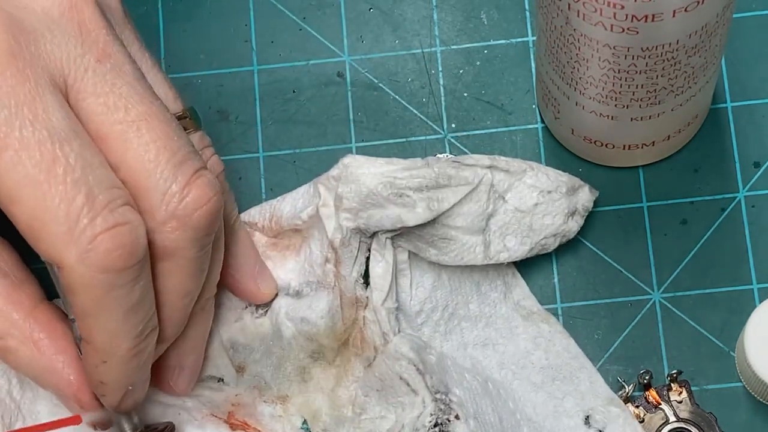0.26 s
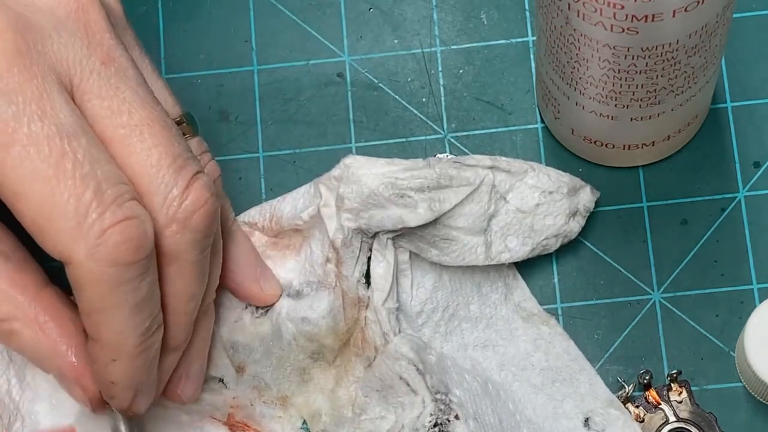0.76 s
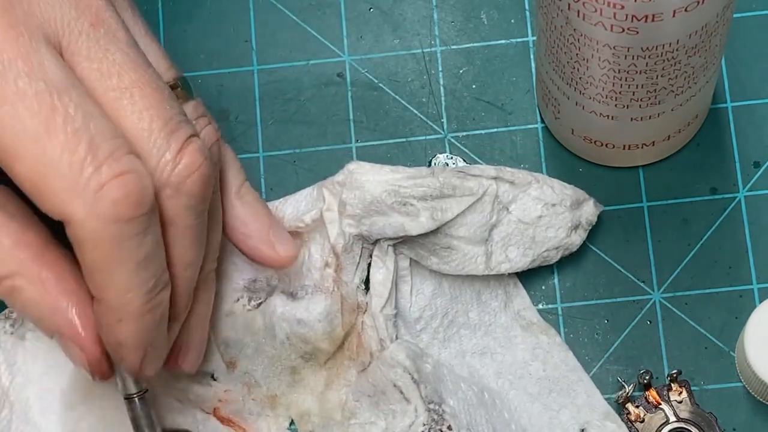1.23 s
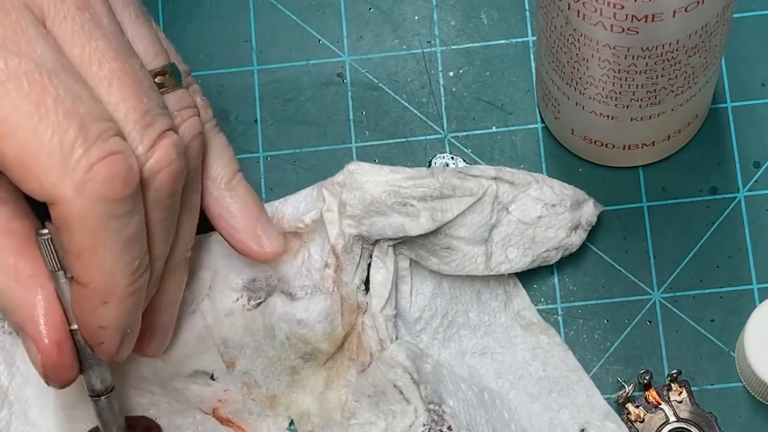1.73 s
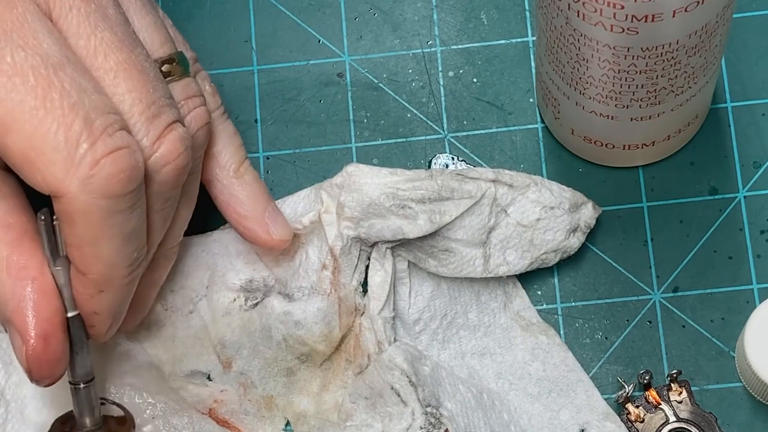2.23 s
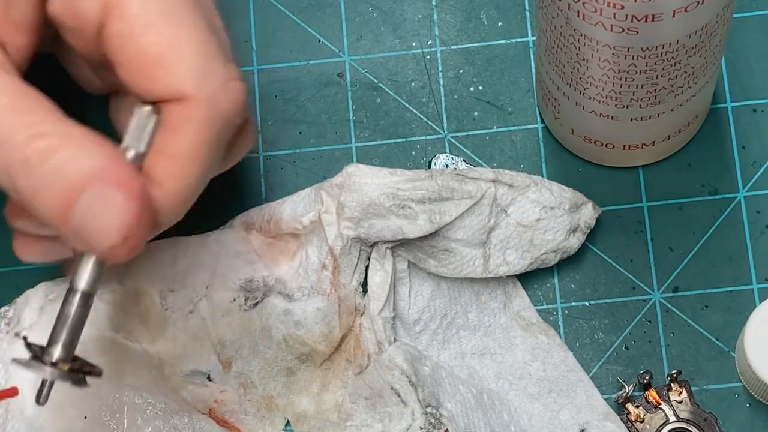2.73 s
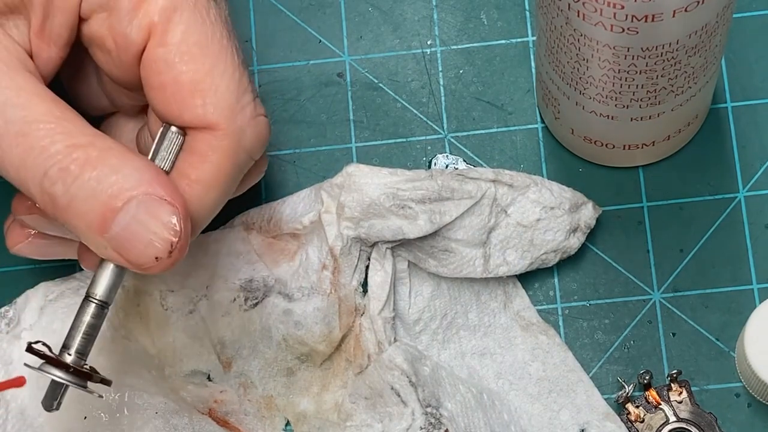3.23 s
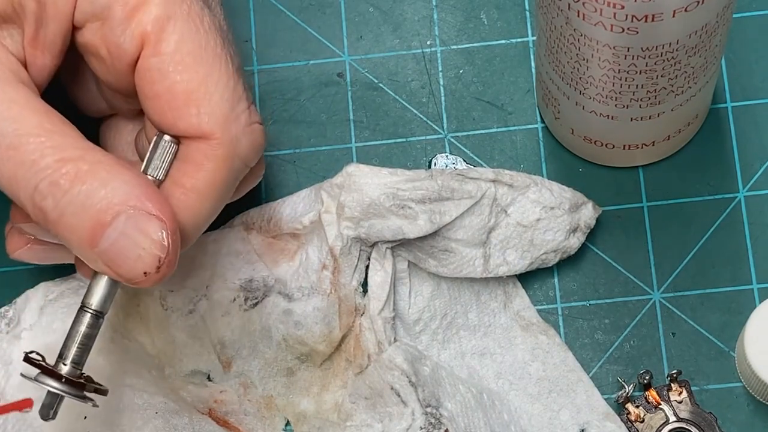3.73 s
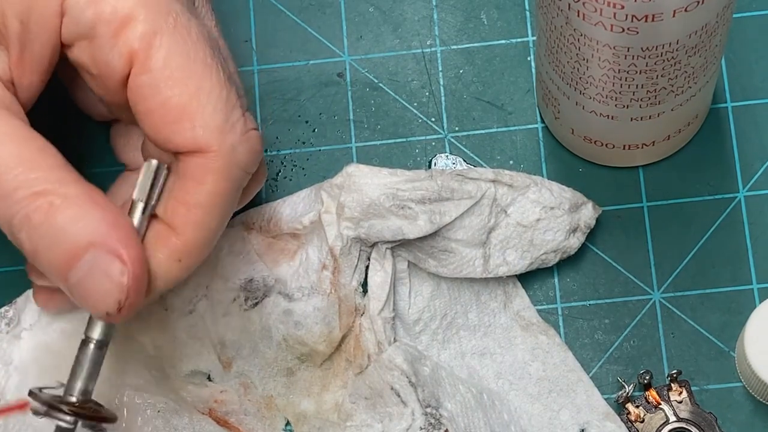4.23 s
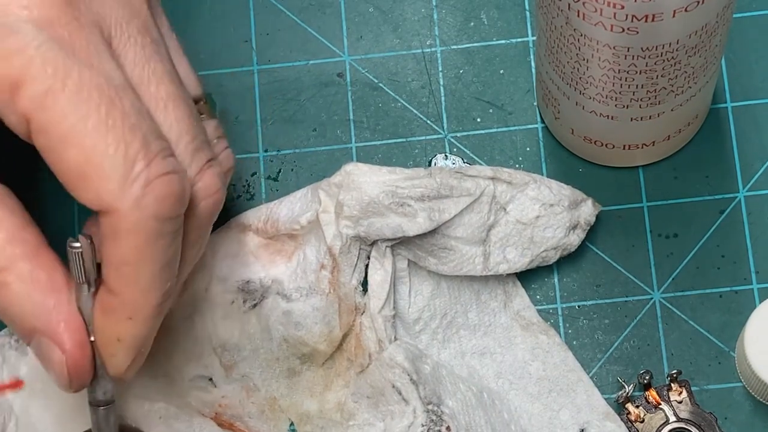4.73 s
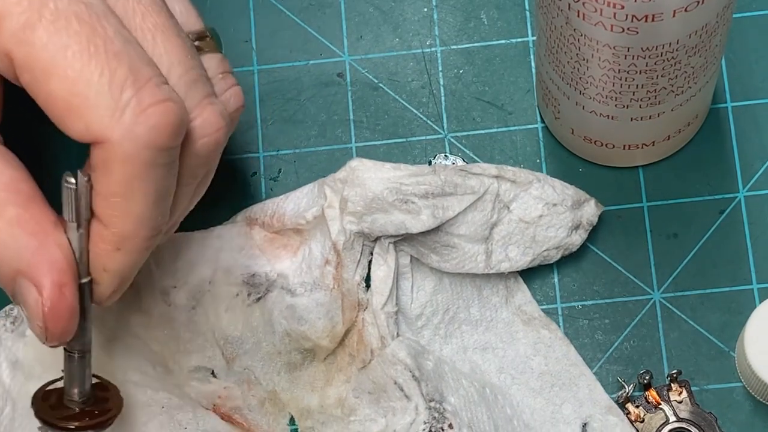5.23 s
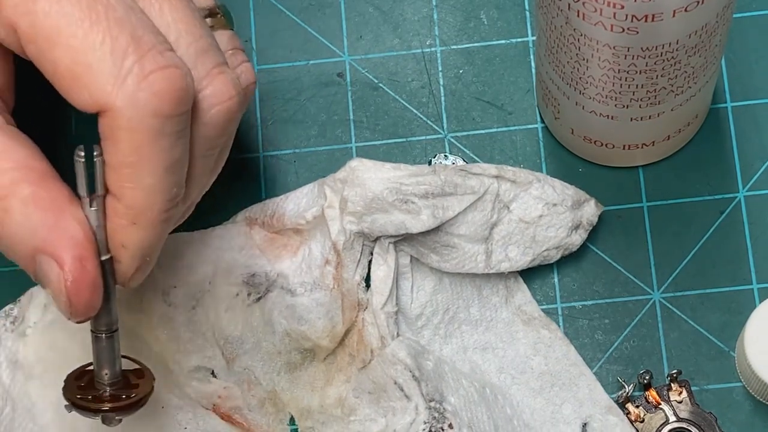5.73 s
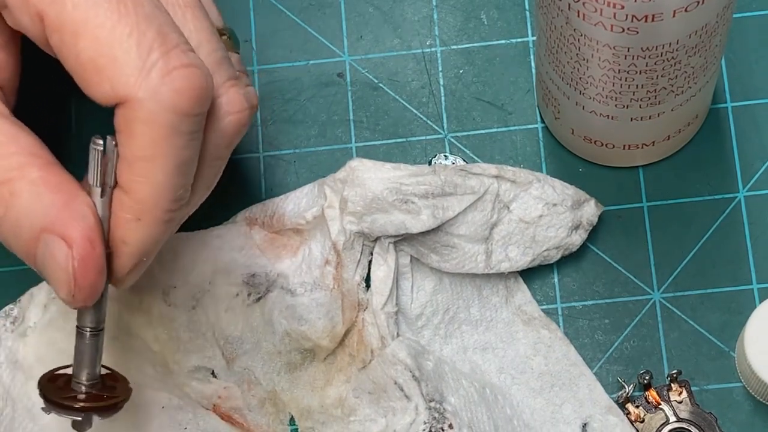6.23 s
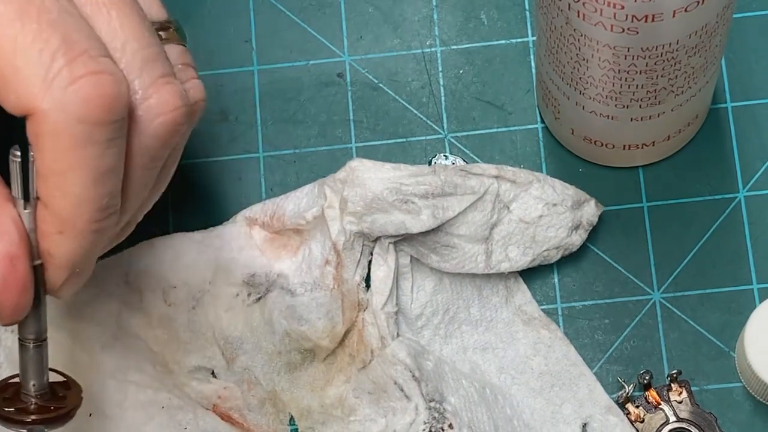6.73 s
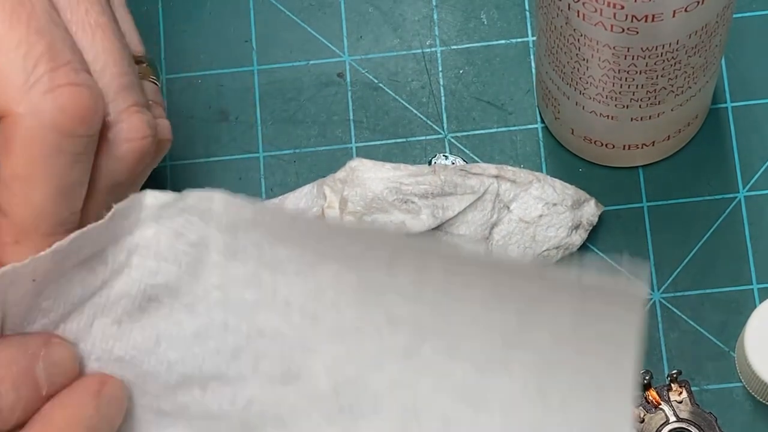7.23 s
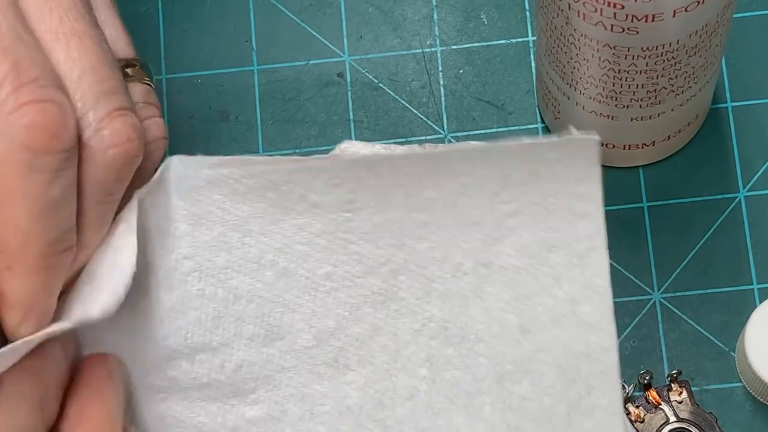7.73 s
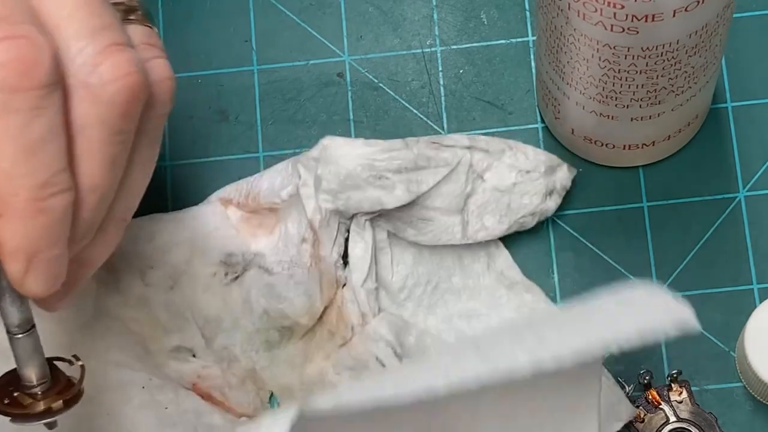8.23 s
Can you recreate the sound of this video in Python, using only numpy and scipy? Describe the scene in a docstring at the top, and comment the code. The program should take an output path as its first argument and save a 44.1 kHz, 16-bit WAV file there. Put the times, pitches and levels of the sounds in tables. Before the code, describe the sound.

A spray can hisses in one short blast and two long bursts, then a hard clunk on a bench and soft paper rustling.

```python
"""At a workbench in a small, quiet room, cleaner is sprayed through a straw: a short blast, then two long bursts.
The jet hisses, splashes and sizzles as coloured noise. The can is set down and a hand bumps the bench:
decaying tones and cracks. Small parts tick as short noise clicks; a paper towel is pulled in as swelling
dense grains. Two close microphone ports hear it all, over still air and a faint mains hum."""
import sys
import numpy as np
from scipy import signal
from scipy.fft import rfft, irfft, next_fast_len
from scipy.io import wavfile

SR = 44100
rng = np.random.default_rng(int(sys.argv[2]) if len(sys.argv) > 2 else 0)


def master(y):
    """Save y as 16-bit WAV."""
    cut = np.clip(np.atleast_2d(y).T, -1, 1)
    pcm = np.round(cut * 32767)  # scale
    wavfile.write(sys.argv[1], SR, pcm.astype(np.int16))


N = 373951
TIME = np.arange(N) / SR  # seconds

# Spectra set only the balance of a sound; its loudness is set separately.
# spectrum of the jet itself: pitch_hz, level_db (per Hz)
JET_SPECTRUM = [(4000, -28.5), (6500, -12.5), (7800, -4.5), (8400, 3.5), (9600, -1), (10600, -7.5),
                (11600, -5.5), (12600, 4), (14300, 1), (15700, -6.5)]
# spectrum of the splash on the part: pitch_hz, level_db (per Hz)
SPLASH_SPECTRUM = [(4500, -27), (5700, -12), (6700, 0), (7900, -0.5), (8800, -9), (11000, -27.5)]
# spectrum of the sizzle at the straw's tip: pitch_hz, level_db (per Hz)
SIZZLE_SPECTRUM = [(8200, -34), (9600, 1), (10600, 2.5), (11700, -2.5), (13000, -16), (16000, -25.5)]
# lower rush of each burst, as the straw is aimed differently: pitch_hz, level_db (per Hz)
RUSH_BLAST_SPECTRUM = [(80, -30.5), (350, -18), (600, -15), (880, -13.5), (1300, -11.5), (1750, -2.5),
                       (2300, .5), (2900, 0), (3700, -6.5), (4400, -5), (5600, -7), (7300, -23),
                       (12300, -90.5)]
RUSH_FIRST_SPECTRUM = [(90, -27), (210, -19.5), (330, -8.5), (560, -7.5), (750, -2.5), (1000, -9),
                       (1250, -9), (2100, -4), (2850, -1.5), (3400, -2.5), (3900, -9), (4400, -3.5),
                       (5400, -9), (7300, -26.5), (12300, -90.5)]
RUSH_SECOND_SPECTRUM = [(90, -29), (210, -19), (330, -7.5), (750, -2.5), (1000, -7.5), (1250, -6),
                        (1700, -4.5), (2200, 2.5), (2800, -0.5), (3500, -7), (4400, 0.5), (5300, -1),
                        (7300, -4.5), (12300, -90)]
# broad ringing of the gap between straw, hand and bench: pitch_hz, width_hz, boost_db
CAVITY_PEAKS = [(356, 110, 0.5), (547.2, 37, 4), (896, 130, 7)]
# presses of the valve, the third only a faint seep: opens_s, closes_s, rise_s,
# first_db (at opening, relative to full flow), strength_db, splash_db, rush_db, kind of rush
VALVE_PRESSES = [(0.0, 0.052, 0.0014, 11, 8, 8.5, -31, "blast"),
                 (.172, 2.655, 0.061, -23.5, -0.5, 8.5, -35, "first"),
                 (3.60, 3.82, 0.017, -10.5, -28, 4, -37.5, "second"),
                 (3.692, 4.928, 0.073, -19.5, -0.23, -1, -34, "second")]
# the part moves in the jet in each long burst: time_s, hiss_db, splash_db, sizzle_db (last two relative to hiss)
AIM_FIRST_BURST = [(0.33, -28.5, -6.5, 2), (0.46, -32.5, -5, 8.5), (0.58, -28.5, -6, 6),
                   (0.76, -32.5, -3, 4), (0.91, -33.5, -3.5, 10.5), (0.99, -33, 0, 4),
                   (1.055, -31, 0.5, -6), (1.09, -35, -0.5, 2), (1.17, -38, -0.5, 3),
                   (1.45, -39.5, 1.5, 0.5), (1.66, -34.5, 3, -5), (2.05, -35, 2, -3),
                   (2.4, -34, -0.5, -7.5), (2.62, -34, -2, -9)]
AIM_SECOND_BURST = [(3.901, -35.5, -7, -2.5), (4.1, -34.5, 1, -2.5), (4.31, -31, -2, -9),
                    (4.43, -36, -1.5, 3.5), (4.53, -32.5, -12, -12), (4.78, -35, -1, -11),
                    (4.9, -34, -1, -4)]
# roar as the jet first strikes the wet cloth from close by: pitch_hz, level_db (per Hz)
ROAR_SPECTRUM = [(250, -36), (650, -7), (900, 1.5), (1200, -2.5), (2100, 1.5), (2900, -9.5), (4500, -20),
                 (8000, -60)]
# loudness of that roar, before the strength of the press: time_s, level_db
ROAR_LEVELS = [(.17, -48), (.28, -36), (.42, -40), (.55, -36.5), (.95, -40.5), (1.15, -47.5), (1.35, -79)]
SHUT_DB_PER_S = 428  # the hiss dies this fast once the valve shuts
DRAIN_DB, DRAIN_DB_PER_S = -25, -75  # what is left in the straw seeps out afterwards
UNSEAT_S = 0.0135  # the valve takes at most this long to leave its seat
RUSH_FOLLOWS, USUAL_HISS_DB = 0.42, -29  # rush dB per dB that the hiss leaves its usual level

# blows on the bench: start_s, strength_db, pitch_hz (first contact), contacts (count), gap_s (to first rebound)
BENCH_BLOWS = [(1.41, -43, 70, 2, .05), (5.952, -20, 822, 3, 0), (5.9619, 5, 1480, 1, 0.0048),
               (5.9664, 1, 1090, 2, 0.0036), (5.9724, 1, 346, 1, 0), (5.994, -8.5, 620, 2, 0.011),
               (6.018, -9, 420, 1, 0), (6.061, -16.5, 398, 1, 0), (6.070, -6, 340, 1, 0),
               (6.462, -18, 280, 2, .02), (6.505, -28, 150, 2, .025), (6.643, -40, 89.8, 1, 0.0019),
               (6.891, -45.5, 111.5, 1, 0), (7.216, -34, 170, 2, 0.054)]
# bench and can ring together: pitch_hz, level_db, t60_s (time to fade by 60 dB)
BENCH_MODES = [(72, -20, .22), (108.5, -14.5, .14), (155, 3, .15), (191, -14.5, 0.11), (259, 0, 0.088),
               (289.5, -5.5, .14), (354, -1.5, .14), (393, 1.5, 0.15), (522, -3, .09), (643, -3.5, 0.15),
               (685, -9, .16), (730, -4.5, .11), (830, -11.5, 0.11), (1055, -14, .1), (1200, -5.5, 0.1),
               (1320, -12, .062), (1577, -21, .1), (1800, -3.5, 0.11), (2200, -13, 0.081),
               (2670, -13, 0.16), (3105, -22.5, .15)]
# noisy crack of a contact: pitch_hz, level_db (per Hz)
CRACK_SPECTRUM = [(100, -12), (400, -1), (1800, 0), (3000, -1), (5000, 0.5), (8500, -8.5), (16000, -16)]
REBOUND_DB, SOFTENING, GAP_GROWTH = -3.0, 0.65, 1.42  # change of level, pitch (power) and gap (factor)

# strokes of fingers and paper towel: loudest_s, half_length_s, rustle_db, flex_db (relative to rustle)
TOWEL_STROKES = [(6.427, 0.035, -54, -2.5), (6.538, 0.063, -47.5, -7), (6.644, 0.015, -47, -4.5),
                 (6.701, 0.037, -58, -1.5), (6.784, 0.0467, -57.5, -12), (7.094, 0.059, -56, -4.5),
                 (7.212, 0.046, -44.5, -1.5), (7.301, 0.031, -46, -7.5), (7.386, 0.056, -53, -4),
                 (7.558, 0.023, -62, -9), (7.652, 0.058, -55, -8), (7.771, 0.05, -45.5, -4.5),
                 (7.862, 0.04, -49, -5), (8.042, 0.031, -45, -6), (8.28, 0.072, -60, -10.5),
                 (8.389, 0.054, -58.5, -10.5), (8.48, 0.0475, -53.5, -9)]
# rustle of the paper fibres: pitch_hz, level_db (per Hz)
FIBRE_SPECTRUM = [(1180, -22), (2000, -1.5), (3000, -4), (4000, -4), (5390, -10), (8260, -1.5), (9010, -6),
                  (9830, -2.5), (12700, -3.5), (14800, -4.5), (16000, -20)]
# flexing of the whole sheet: pitch_hz, level_db (per Hz)
SHEET_SPECTRUM = [(88, -37.5), (150, -12.5), (257, -11), (331, -8.5), (398, -6.5), (485, -6), (769, -5),
                  (866, -3.5), (3500, -18.5), (4550, -43), (7700, -120)]
# broad resonances of the sheet: pitch_hz, width_hz, boost_db
SHEET_RESONANCES = [(190, 60, 0), (870, 170, 0.5), (1468, 870, 1.5), (2510, 1147, 3)]
STROKE_SHAPE = 1.5  # 1 is a pointed swell, 2 a round one
HELD_S, HELD_DB, HELD_FLEX_DB = 6.40, -68.5, -8.5  # from here on the held paper rubs faintly between strokes

# light ticks and scuffs of valve, can, metal part and fingers: start_s, level_db, pitch_hz (band centre), t60_s
SMALL_TICKS = [(2.846, -49, 7500, .03), (3.662, -56.5, 2210, 0.074), (3.701, -44, 9000, 0.038),
               (5.350, -59, 7800, .04), (5.984, -32, 2900, 0.45), (5.985, -43, 9400, 0.47),
               (6.063, -40.5, 8700, 0.18), (6.065, -34, 2800, 0.114), (6.2942, -59, 8650, 0.026),
               (6.7167, -51, 1602, 0.036), (6.880, -41, 1486, 0.019), (6.8813, -49, 2900, 0.014),
               (7.187, -47.5, 1345, 0.098), (8.128, -56, 2800, .04)]

# still air: pitch_hz, level_db (per Hz)
AIR_SPECTRUM = [(30, -9), (55, -7.5), (75, -6), (95, -16.5), (125, -6.5), (160, -22), (220, -22.5),
                (600, -26.5), (1300, -31.5), (2500, -32.5), (5900, -37.5), (9000, -35), (16000, -31.5)]
HUM_HZ, HUM_DB = 120.3, -74  # the level wanders around this

# reverberation of the room: pitch_hz, t60_s
ROOM_DECAY = [(120, 0.9), (400, 0.77), (1200, 0.67), (3000, 0.75), (8000, 0.57), (15000, 0.15)]
# how the two ports hear spray, paper and ticks: pitch_hz, left_lead_rad, likeness (0-1), left_louder_db
PORT_DIFFERENCES = [(150, 0.5, 1, .5), (380, 0.2, 0.8, 1.4), (540, 0.5, 1, 0.3), (760, 1.6, .4, 3),
                    (910, 0.27, 1, 3.5), (1150, 0.27, 0, 0.9), (1400, 1, 0.6, 7.5), (1700, 2, 0.3, 1),
                    (2330, 2.5, 0.7, 4), (2810, 2.5, .7, 2.5), (3630, 3, 0.7, 1.5), (3950, 4.5, 0.4, 1.5),
                    (4260, 5.5, 0.8, 1), (5300, 6, 0, 1.5), (6100, 6.5, 0.7, 2), (7000, 7.5, 0.98, -0.3),
                    (7500, 6, 0.98, 0), (8600, 6.5, 0.98, -0.1), (15000, 6.5, 0.91, 0)]
# how much the ports differ for blows on the bench: pitch_hz, level_db
BLOW_WIDTH = [(60, -4), (250, -5.5), (520, 0), (700, -3), (1200, -6), (2500, -1), (4400, -1), (7500, -4.5),
              (16000, -5)]
# notches and peaks of the microphone's housing: pitch_hz, width_hz, boost_db
HOUSING_PEAKS = [(8400, 300, 2.5), (8670, 80, 4), (8970, 80, 4), (9200, 330, -15), (9600, 130, 6.5),
                 (13110, 110, 5), (13530, 480, -18)]
TOP_HZ = 15700  # nothing much is heard above this
LEFT_RIGHT = np.array([[1], [-1]])  # adds to the left port, takes from the right


def spray(drops_db=-6, flutter_db=.5, sputter_db=0.32, hiss_db=5.0, splash_db=-2.7, sizzle_db=-2.0):
    """Gas and droplets leave the straw; the jet hisses, splashes on the part and stirs a lower rush."""
    flow = amp(flutter_db * walk(28) + sputter_db * walk(170))  # liquid and gas alternate in the straw

    def jet(points, wander_db):
        """Smooth gas noise with droplet clicks, slowly wandering in level."""
        mist = rng.standard_normal(N) + amp(drops_db) * grains(2500, 2.5)
        return colour(mist, points) * amp(wander_db * walk(18))

    hiss = jet(JET_SPECTRUM, 0.71)
    splash = jet(SPLASH_SPECTRUM, 0.47)
    sizzle = jet(SIZZLE_SPECTRUM, 1.0)
    rushes = {
        "blast": bells(jet(RUSH_BLAST_SPECTRUM, 0.9), CAVITY_PEAKS),
        "first": bells(jet(RUSH_FIRST_SPECTRUM, 0.9), CAVITY_PEAKS),
        "second": bells(jet(RUSH_SECOND_SPECTRUM, 0.9), CAVITY_PEAKS),
    }

    level, on_part, wet = curves(AIM_FIRST_BURST + AIM_SECOND_BURST)
    nozzle = amp(level) * (amp(hiss_db) * hiss + amp(wet + sizzle_db) * sizzle)
    splash = amp(level + on_part + splash_db) * splash
    stir = amp(RUSH_FOLLOWS * (level - USUAL_HISS_DB))
    roar = amp(curves(ROAR_LEVELS)[0]) * jet(ROAR_SPECTRUM, 0.6)

    out = np.zeros(N)
    for opens, closes, rise, first_db, db, part_db, rush_db, kind in VALVE_PRESSES:
        rush = amp(rush_db) * stir * rushes[kind]
        burst = nozzle + roar + amp(part_db) * splash + rush
        out += valve(opens, closes, rise, first_db) * amp(db) * burst
    return flow * out


def valve(opens, closes, rise, first_db):
    """The valve cracks open, eases to full flow, holds and shuts quickly; then the straw drains."""
    since = np.maximum(TIME - opens, 0)
    shut = np.maximum(TIME - closes, 0)
    unseating = np.minimum(since / min(UNSEAT_S, rise), 1)
    easing = amp(first_db * np.exp(-since / rise))
    closing = amp(-SHUT_DB_PER_S * shut)
    draining = amp(DRAIN_DB + DRAIN_DB_PER_S * shut)
    return unseating * easing * np.maximum(closing, draining)


def knocks(modes_db=-21.5, crack_db=-15, crack_t60=0.1, bounce_db=1, bounce_cycles=5, reach=2.0, edge_db=-25):
    """Each contact bounces for a few cycles and rings the bench; a softer one reaches only the low modes."""
    t = TIME[:SR // 2]
    ring = np.zeros(len(t))
    for k, (hz, db, t60) in enumerate(BENCH_MODES):
        sign = (-1) ** k  # neighbouring modes start in opposite directions
        ring += sign * amp(db) * fade(t, t60) * np.sin(2 * np.pi * hz * t)

    out = np.zeros(N)
    for s, db, hz in contacts():
        crack = colour(rng.standard_normal(len(t)), CRACK_SPECTRUM) * fade(t, crack_t60)
        blow = amp(modes_db) * ring + amp(crack_db) * crack
        soft = signal.sosfilt(signal.butter(4, reach * hz, fs=SR, output="sos"), blow)
        edge = amp(edge_db) * (hz / 1000) ** 2 * blow  # a hard rim adds brightness
        onset = 1 - np.exp(-(2 * hz * t) ** 2)
        bounce = np.sin(2 * np.pi * hz * t) * fade(t, bounce_cycles / hz) * onset
        add(out, s, amp(db) * (soft + edge + amp(bounce_db) * bounce))
    return out


def contacts():
    """Each blow settles in a run of weaker, softer rebounds; gives (s, dB, Hz) for every contact."""
    for s, db, hz, count, gap in BENCH_BLOWS:
        for k in range(round(count)):
            yield s, db + k * REBOUND_DB, hz / (k + 1) ** SOFTENING
            s = s + gap * GAP_GROWTH ** k


def towel(rub_db=-4, fibres_db=0.5, sheet_db=1):
    """Paper fibres snag and slip in dense grains while the sheet flexes; each stroke swells and dies away."""
    def friction(points):
        """Snagging grains over a steady rub."""
        rub = grains(1500, 1.2) + amp(rub_db) * rng.standard_normal(N)
        return patchy(colour(rub, points), depth_db=1.35, rate=60)

    fibres = friction(FIBRE_SPECTRUM)
    sheet = bells(friction(SHEET_SPECTRUM), SHEET_RESONANCES)
    rustle = amp(HELD_DB)
    flex = amp(HELD_DB + HELD_FLEX_DB)
    for s, half, db, flex_db in TOWEL_STROKES:
        swell = amp(db) * np.exp(-np.abs((TIME - s) / half) ** STROKE_SHAPE)
        rustle = np.hypot(rustle, swell)  # strokes add up in power
        flex = np.hypot(flex, amp(flex_db) * swell)
    return (TIME >= HELD_S) * (amp(fibres_db) * rustle * fibres + amp(sheet_db) * flex * sheet)


def ticks(skirt_db=-26):
    """Light contacts give short noise clicks, each in one broad band."""
    t = TIME[:SR // 8]
    out = np.zeros(N)
    for s, db, hz, t60 in SMALL_TICKS:
        band = [(hz / 4, 2 * skirt_db), (hz / 2, skirt_db), (hz, 0), (hz * 2, skirt_db), (hz * 4, 1.3 * skirt_db)]
        click = colour(rng.standard_normal(len(t)), band) * fade(t, t60)
        add(out, s, amp(db) * click)
    return out


def background(side_db=-12, air_db=-66, wander_db=2.5):
    """Still room air, slightly different at each port, and a faint mains hum of wandering level."""
    mid = colour(rng.standard_normal(N), AIR_SPECTRUM)
    side = colour(rng.standard_normal(N), AIR_SPECTRUM)
    air = amp(air_db) * (mid + amp(side_db) * side * LEFT_RIGHT)
    hum = amp(HUM_DB + wander_db * walk(5.9)) * unit(np.sin(2 * np.pi * HUM_HZ * TIME))
    return air + hum


def room():
    """The room's echoes blur into a tail of noise for each port, with its own decay time in each band."""
    t = TIME[:SR]
    noise = rng.standard_normal((2, SR))
    bands = split_bands(noise, [hz for hz, _ in ROOM_DECAY])
    tail = sum(band * fade(t, t60) for band, (_, t60) in zip(bands, ROOM_DECAY))
    return unit(tail * np.minimum(t / 0.0025, 1)) / np.sqrt(SR)


def reflections(t60):
    """Nearby hands and bench reflect at once: a short tail of noise for each port."""
    t = TIME[:SR]
    return unit(rng.standard_normal((2, SR)) * fade(t, t60) * (t > .001)) / np.sqrt(SR)


def ports(source, tail, near_db, room_db):
    """A spread-out source: the ports share one part, the left ahead in phase, and hear the rest differently."""
    paths = amp(near_db) * reflections(.04) + amp(room_db) * tail
    pair = np.array([source(), source()])
    shared, apart = pair + signal.fftconvolve(pair, paths, axes=1)[:, :N]
    hz, lead, likeness, left_db = np.transpose(PORT_DIFFERENCES)
    likeness = np.clip(likeness, 0, 1)

    def read(column, f):
        """One column of the port table at any frequency."""
        return lookup(list(zip(hz, column)), f)

    alike = filtered(shared, lambda f: np.sqrt((1 + read(likeness, f)) / 2))
    unlike = filtered(apart, lambda f: np.sqrt((1 - read(likeness, f)) / 2))
    both = alike + LEFT_RIGHT * unlike

    def tilt(f):
        """Half of each level and phase difference goes to each port."""
        return amp(LEFT_RIGHT * read(left_db, f) / 2) * np.exp(1j * LEFT_RIGHT * read(lead, f) / 2)
    return filtered(both, tilt)


def heard(x, tail, lead_ms, lead_db, left_db, spread_db, room_db):
    """A blow reaches the ports with phase and level differences; hands and bench reflect, the room follows."""
    near = filtered(reflections(.08), lambda f: f / np.hypot(f, 700))  # small things reflect only short waves
    paths = near * amp([[-7], [spread_db]]) + amp(room_db) * tail
    shared, apart = signal.fftconvolve(x[None], paths, axes=1)[:, :N]

    def difference(f):
        """The real part is level, the imaginary part phase; lead_ms sets how the phase varies with pitch."""
        return amp(left_db) + 1j * amp(lead_db) * np.sin(2 * np.pi * f * lead_ms / 1000)
    direct = filtered(x, difference)
    side = filtered(apart + direct, lambda f: amp(lookup(BLOW_WIDTH, f)))
    return x + shared + side * LEFT_RIGHT


def amp(db):
    """Decibels to gain."""
    return 10 ** (np.asarray(db) / 20)


def unit(x):
    """Scale to an rms (average strength) of 1."""
    return x / np.sqrt(np.mean(x ** 2))


def lookup(points, hz):
    """Read (Hz, value) points on a log-frequency axis."""
    f, value = np.transpose(points)
    return np.interp(np.log(hz + 1), np.log(f), value)


def filtered(x, gain):
    """Filter by a gain given as a function of frequency."""
    length = x.shape[-1]
    size = next_fast_len(length + 4096)
    return irfft(rfft(x, size) * gain(np.fft.rfftfreq(size, 1 / SR)), size)[..., :length]


def colour(x, points):
    """Filter x by (Hz, dB) points and scale to rms 1."""
    return unit(filtered(x, lambda f: amp(lookup(points, f))))


def bells(x, rows):
    """Bell-shaped peaks and notches."""
    def gain(f):
        return amp(sum(db * np.exp(-2 * ((f - hz) / width) ** 2) for hz, width, db in rows))
    return filtered(x, gain)


def split_bands(x, centres):
    """Split x into overlapping bands that add up to x again."""
    for share in np.eye(len(centres)):
        yield filtered(x, lambda f: lookup(list(zip(centres, share)), f))


def patchy(x, depth_db, rate):
    """Let five bands of x, low to high, flicker each on its own."""
    return sum(band * amp(depth_db * walk(rate)) for band in split_bands(x, (400, 1200, 2800, 6000, 12000)))


def curves(rows):
    """Each column after the time as a signal."""
    s, *columns = np.transpose(rows)
    return [np.interp(TIME, s, c) for c in columns]


def walk(rate):
    """Random values, rate per second, joined by straight lines; the spread is near 1."""
    knots = rng.standard_normal(4096)
    return 1.5 * np.interp(TIME * rate, np.arange(len(knots)), knots)


def grains(rate, spread_db):
    """Tiny clicks at random moments, about rate per second, a few larger than the rest."""
    moments = rng.random(N) < rate / SR
    sizes = amp(spread_db * np.minimum(rng.exponential(size=N), 4))
    return unit(moments * rng.standard_normal(N) * sizes)


def fade(t, t60):
    """Exponential decay by 60 dB in t60 seconds."""
    return np.exp(-np.log(1000) * t / t60)


def add(out, s, sound):
    """Mix a sound in at a time in seconds."""
    i = int(s * SR)
    out[i:i + len(sound)] += sound[:N - i]


def scene():
    """All sources around the bench."""
    tail = room()
    spraying = ports(spray, tail, near_db=-8.5, room_db=-20.0)
    blows = heard(knocks(), tail, lead_ms=.07, lead_db=2.5, left_db=-24.5, spread_db=0.5, room_db=-19.5)
    handling = ports(lambda: towel() + ticks(), tail, near_db=-4, room_db=-18.5)
    return spraying + blows + handling + background()


def record(dry, low_cut_hz=48):
    """The housing colours the treble, rumble and top are cut, and any peaks beyond full scale clip."""
    high_pass = signal.butter(4, low_cut_hz, "high", fs=SR, output="sos")
    low_pass = signal.ellip(10, .2, 80, TOP_HZ, fs=SR, output="sos")
    housed = bells(dry, HOUSING_PEAKS)
    clipped = np.clip(signal.sosfilt(high_pass, housed), -1, 1)
    return signal.sosfilt(low_pass, clipped)


dry = scene()
out = record(dry)
master(out)
```